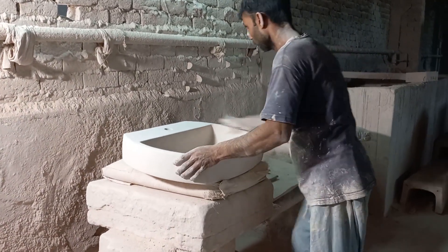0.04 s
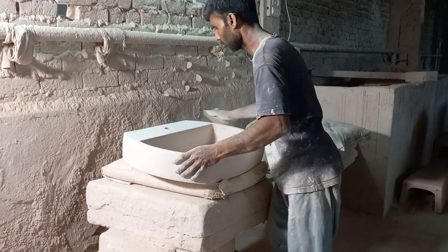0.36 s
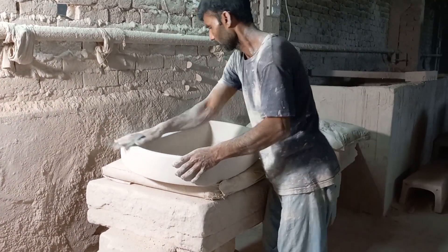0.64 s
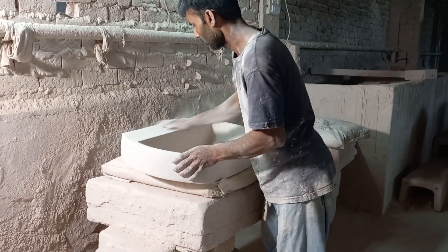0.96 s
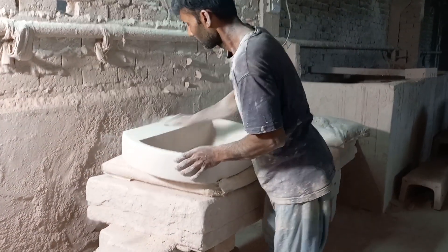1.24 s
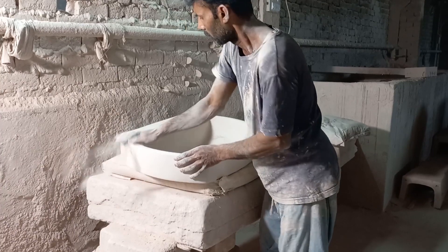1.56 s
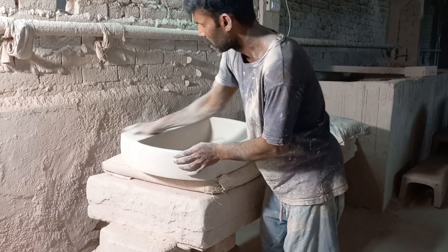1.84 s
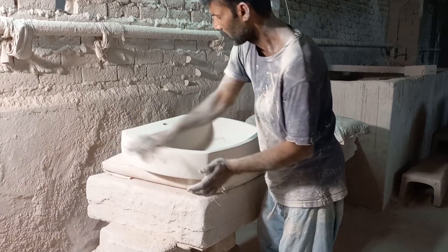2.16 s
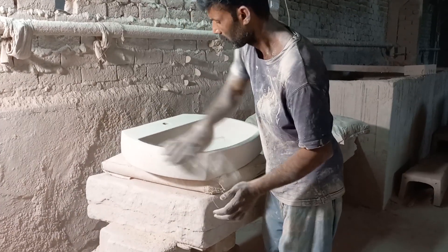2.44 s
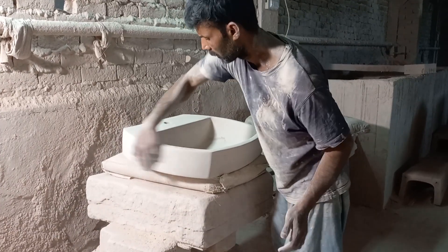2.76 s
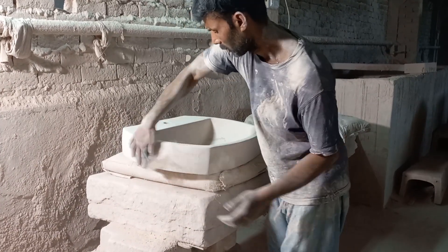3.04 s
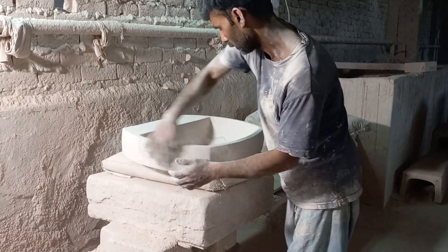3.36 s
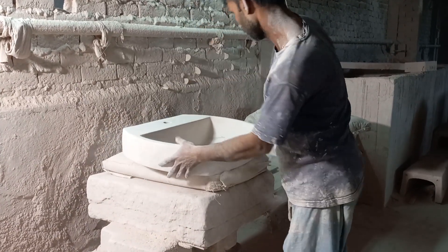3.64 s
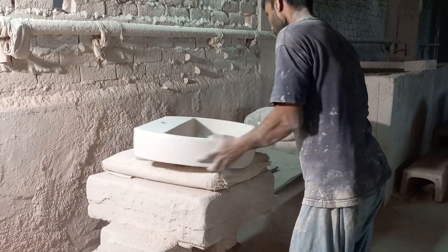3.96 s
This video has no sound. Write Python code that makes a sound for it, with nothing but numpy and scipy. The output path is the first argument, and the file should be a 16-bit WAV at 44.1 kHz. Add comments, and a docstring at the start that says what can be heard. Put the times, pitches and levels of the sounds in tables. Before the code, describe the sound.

Quick rasping strokes sand a ceramic basin by hand, with a low workshop hum behind.

```python
"""Over the low rumble of a workshop, a worker sands a dry ceramic basin by hand, about five strokes a second.
From the first stroke, grit sticks and slips under the pad: a coarse rasp, a gritty scrape and a fine hiss, with
the basin ringing faintly and brick walls scattering the sound. Now and then the pad scrapes the rim or lands
with a scuff. After three and a half seconds the strokes pause, a sleeve brushes over the dusty glaze, and the
sanding starts again."""
import sys
import numpy as np
from scipy import signal
from scipy.fft import rfft, irfft
from scipy.io import wavfile

SR = 44100
rng = np.random.default_rng(int(sys.argv[2]) if len(sys.argv) > 2 else 0)


def master(y):
    """Save y as 16-bit WAV."""
    cut = np.clip(np.atleast_2d(y).T, -1, 1)
    pcm = np.round(cut * 32767)  # scale
    wavfile.write(sys.argv[1], SR, pcm.astype(np.int16))


N = 176400
T, HZ = np.arange(N) / SR, np.arange(N // 2 + 1) * SR / N


def undb(db):
    """Amplitude ratio of a level in decibels."""
    return 10 ** (np.asarray(db) / 20)


def unit(x):
    """Normalisation to rms 1."""
    return x / np.sqrt(np.mean(x ** 2))


def over_hz(points):
    """Interpolation of (Hz, value) points on a log-frequency axis."""
    hz, value = np.array(points).T
    return np.interp(np.log(HZ + 1), np.log(hz), value)


def colour(x, spectrum):
    """Spectral shaping by (Hz, dB) points, at rms 1."""
    return unit(irfft(rfft(x) * undb(over_hz(spectrum)), N))


def wander(rate_hz):
    """Low-passed noise: a smooth random fluctuation at rms 1."""
    return unit(irfft(rfft(rng.standard_normal(N)) / (1 + (HZ / rate_hz) ** 2) ** 2, N))


def pan(left_over_right_db):
    """Stereo gains for a level difference between the sides."""
    return undb(np.array([[left_over_right_db], [-left_over_right_db]]) / 2)


def ramp(x):
    """A quarter sine from 0 to 1, like the speed of a swinging hand."""
    return np.sin(np.pi / 2 * np.clip(x, 0, 1))


def stick_slip(slips_per_s=20000, spread_db=2, direct_share=0.024):
    """Stick-slip impulses, many weak and a few strong; scattering makes left and right differ."""
    size = undb(spread_db * np.minimum(rng.exponential(size=(3, N)), 2 * np.pi))
    slipping = rng.random((3, N)) < slips_per_s / SR
    slips = slipping * size * rng.choice([-1, 1], (3, N))
    direct, scattered = slips[0], slips[1:]
    return unit(np.sqrt(direct_share) * direct + np.sqrt(1 - direct_share) * scattered)


def glide(start, length, first_hz, last_hz, width_hz, db):
    """Narrow-band noise about a moving centre: a rough resonance that swells, glides and fades."""
    progress = np.clip((T - start) / length, 0, 1)
    phase = 2 * np.pi * np.cumsum(first_hz + (last_hz - first_hz) * progress) / SR
    band = [wander(width_hz) * np.cos(phase) + wander(width_hz) * np.sin(phase) for side in range(2)]
    return undb(db) * np.sin(np.pi * progress) * np.array(band)


# Spectrum of the rumble. Each row: frequency in Hz, relative level in dB.
RUMBLE_SPECTRUM = [(36, -37), (50, -22), (65, -8.5), (90, -5.5), (120, -5.5), (200, 0), (300, -2.5),
                   (460, -1), (600, -6.5), (800, -4.5), (1700, -10.5), (3000, -16.5), (6000, -26),
                   (10500, -37.5)]
# Likeness of its left and right sides. Each row: frequency in Hz, coherence from 0 to 1.
RUMBLE_COHERENCE = [(100, 0.97), (300, 0.96), (600, 0.84), (1100, 0.7), (3000, 0)]
# Its slow drift. Each row: time in seconds, level in dB.
RUMBLE_DRIFT = [(0, -40), (.4, -40.5), (1, -40.5), (1.8, -41), (2.3, -40.5), (2.8, -42.5), (3.5, -40),
                (4, -40)]

def workshop_rumble():
    """Partly coherent noise: the two sides agree in the bass and are independent in the treble."""
    coherence = over_hz(RUMBLE_COHERENCE)
    mid, side = (irfft(rfft(colour(rng.standard_normal(N), RUMBLE_SPECTRUM)) * np.sqrt(share), N)
                 for share in ((1 + coherence) / 2, (1 - coherence) / 2))
    level_db = np.interp(T, *np.array(RUMBLE_DRIFT).T)
    return np.array([mid + side, mid - side]) * undb(level_db)


# Tones of the machine hum. Each row: frequency in Hz, level in dB.
HUM_TONES = [(111.5, -58), (161.7, -57.5), (541, -71)]

def machine_hum():
    """Random amplitude and phase modulation makes each tone waver."""
    hum = 0
    for hz, db in HUM_TONES:
        amplitude = 1 + 0.67 * wander(rate_hz=28)
        phase = 2 * np.pi * hz * T + 0.85 * wander(rate_hz=4.6)
        hum += undb(db) * unit(amplitude * np.sin(phase))
    return hum


def brick_walls(x, t60_s=0.3, tail_db=-12.5):
    """Reverberation: diffuse reflections add an exponentially decaying tail, different at each side."""
    t = T[:SR // 2]
    tail = rng.standard_normal((2, len(t))) * ramp(t / 0.013) * np.exp(-np.log(1000) * t / t60_s)
    response = unit(tail) / np.sqrt(len(t))
    return x + undb(tail_db) * signal.fftconvolve(x, response, axes=-1)[:, :N]


# Spectrum of the sleeve on dusty glaze. Each row: frequency in Hz, relative level in dB.
BRUSH_SPECTRUM = [(1500, -5), (3000, -2), (4300, -8), (5900, -4), (8000, -19), (16000, -16)]

def sleeve_brush(start=3.715, length=0.18, db=-50):
    """Light sliding friction between strokes: a soft brush with a rising resonance."""
    swell = np.sin(np.pi * np.clip((T - start) / length, 0, 1))
    brush = undb(db) * swell * colour(stick_slip(), BRUSH_SPECTRUM)
    return brush + glide(start, length, first_hz=2601.5, last_hz=3697, width_hz=600, db=-56)


# Landings of the pad. Each row: time of the peak in seconds, level in dB.
PAD_LANDINGS = [(.494, -41), (2.734, -28), (3.92, -43.5)]
# Spectrum of their scuff. Each row: frequency in Hz, relative level in dB.
SCUFF_SPECTRUM = [(300, -29), (1000, 5), (2200, 9), (2900, -6), (3800, -5), (5900, 12), (8500, -3),
                  (16000, -4)]

def pad_landings(rise_s=0.0097, decay_s=0.019):
    """Contact transients: the pad meets the basin in a bright scuff that decays exponentially."""
    push = sum(undb(db) * ramp((T - at) / rise_s + 1) * np.exp(-np.maximum(T - at, 0) / decay_s)
               for at, db in PAD_LANDINGS)
    return push * colour(stick_slip(), SCUFF_SPECTRUM)


# Hollow scrapes. Each row: start and length in seconds, first Hz, last Hz, width in Hz, level in dB.
RIM_SCRAPES = [(-.01, 0.12, 3080, 2740, 810, -36.5), (0, .11, 1700, 1400, 600, -39.5),
               (1.99, 0.15, 2784, 1913, 970, -36), (2.495, 0.068, 3160, 2654, 700, -34.5),
               (2.471, .195, 1836, 1606, 190, -38.5), (3.122, 0.08, 3600, 3050, 1000, -32)]

def rim_scrapes():
    """Friction excites a resonance that sinks as the pad slides over the rim."""
    return sum(glide(*row) for row in RIM_SCRAPES)


# Spectrum of the basin on its padded stand. Each row: frequency in Hz, relative level in dB.
THRUM_SPECTRUM = [(40.0, -37), (70.0, -21), (105.0, 4.5), (200.0, -9), (350.0, 0), (600.0, -12.5),
                  (2000.0, -32.5)]

def stand_thrum(drive, db=-46.5):
    """Forced vibration: the hand shakes the basin and its stand."""
    return drive * undb(db) * colour(rng.standard_normal(N), THRUM_SPECTRUM)


# Lower and upper modes of the basin. Each row: frequency in Hz, width in Hz, relative level in dB.
LOWER_MODES = [(3115, 360, 2), (3415, 540, 1.5)]
UPPER_MODES = [(4580, 120, 2.5), (4820, 85, -10), (5626, 540, -0.5)]

def basin_ring(lower_drive, upper_drive, lower_db=-37, upper_db=-40):
    """Modal resonance: slips of grit excite the damped modes of the ceramic."""
    def ring(modes):
        total = 0
        for hz, width_hz, db in modes:
            resonance = 1j * HZ * width_hz / (hz ** 2 - HZ ** 2 + 1j * HZ * width_hz)
            total += undb(db) * irfft(rfft(stick_slip()) * resonance ** 2, N)  # squared for steep sides
        return unit(total)

    lower = lower_drive * undb(lower_db) * ring(LOWER_MODES)
    upper = upper_drive * undb(upper_db) * ring(UPPER_MODES)
    return lower + upper


def shifting_bands(x, depth_db=1.5, knee_hz=2126):
    """Band-wise modulation: as the hand crosses the curved basin, narrow bands swell and fade at random."""
    spectrum, shifted = rfft(x), 0
    band = 10 * np.log1p(HZ / knee_hz)  # bands widen above the knee
    for k in range(int(band[-1]) + 2):
        triangle = np.maximum(1 - abs(band - k), 0)
        shifted += irfft(spectrum * triangle, N) * undb(depth_db * wander(rate_hz=23))
    return shifted


# Strokes of the hand. Each row: start, length, attack and release in seconds, level and swell over the
# stroke in dB, then offsets in dB for the rasp, the lower modes, the hiss and the thrum.
HAND_STROKES = [(0.04, 0.2, 0.041, 0.083, -2.5, 8, -3.5, 0, -1.5, -1.5),
                (0.221, 0.18, 0.1, 0.12, -5, 2, 0, 2, -2, -1),
                (0.471, 0.12, 0.065, 0.064, 0, 2, 0.5, 0.5, 0, -2),
                (0.552, 0.19, 0.056, 0.15, 1, -2.5, -1, -1, -1, 2),
                (0.713, 0.2, 0.099, 0.092, -4, -1.5, -0.5, -0.5, 3.5, 0.5),
                (0.852, 0.13, 0.045, 0.095, -7, -4, 1.5, 8, 1.5, -1),
                (0.955, 0.23, 0.075, 0.084, -2, -5, 0.5, 2, 1, 5.5),
                (1.161, 0.22, 0.11, 0.07, -2, -7, -0.5, 0.5, 1.5, 0.5),
                (1.359, 0.25, 0.068, 0.082, -1, 0.5, 0.3, -1, -0.5, 0.5),
                (1.581, 0.23, 0.077, 0.13, -1.5, -4, -3, -2, 1, 1.2),
                (1.779, 0.38, 0.12, 0.13, -0.9, 0, -1, -4, -0.1, -1.5),
                (2.138, 0.15, 0.06, 0.057, -2, 1.5, -2, -11, -0.5, -5.2),
                (2.27, 0.19, 0.054, 0.12, -2.5, -3.5, 1.5, -2, 0.7, -15),
                (2.4, 0.29, 0.17, 0.16, -2, -3.5, -0.5, -4, 0.5, -12),
                (2.699, 0.29, 0.047, 0.17, 0, 3, -0.2, 1.5, -1, -17),
                (2.975, 0.12, 0.087, 0.075, -2.1, 7.5, -2, 0.5, 2, -2),
                (3.07, 0.22, 0.13, 0.073, 0, -1, -2.5, -11, -1.3, -1.5),
                (3.281, 0.15, 0.046, 0.1, -3.8, -3, -2.5, -2.5, -1.5, -4.7),
                (3.403, 0.18, 0.059, 0.13, -1.4, -3.5, -2.7, -6, -0.5, -8),
                (3.87, 0.087, 0.044, 0.047, -19.5, 6, -4, 3, 5.5, 10),
                (3.94, 0.155, 0.082, 0.05, -8.5, 7, -2, 1, -1, 4)]

def stroke_drives():
    """Power laws turn effort into five envelopes; overlapping strokes add in energy."""
    energy = np.zeros((5, N))
    for start, length, attack, release, db, swell_db, rasp_db, ring_db, hiss_db, thrum_db in HAND_STROKES:
        age = T - start
        level_db = db + swell_db * (np.clip(age / length, 0, 1) - 0.5)
        effort = ramp(age / attack) * ramp((length - age) / release) * undb(level_db)
        drag = effort ** 0.52  # rasp and thrum last through the turns
        rush = effort ** 1.29  # hiss needs speed
        energy += np.array([effort, drag * undb(rasp_db), effort * undb(ring_db),
                            rush * undb(hiss_db), drag * undb(thrum_db)]) ** 2
    return np.sqrt(energy)


# Spectra of gritty scrape, coarse rasp and fine hiss. Each row: frequency in Hz, relative level in dB.
GRIT_SPECTRUM = [(400.0, -42), (1200.0, -14), (2400.0, -4.5), (3300.0, -1), (4100.0, 0), (4700.0, 1),
                 (5700.0, -2), (7000.0, -2.5), (8200.0, -12), (16000.0, -29)]
RASP_SPECTRUM = [(150.0, -19), (350.0, -13.5), (650.0, -6.5), (1000.0, 1.5), (1600.0, 1.7), (2500.0, 5.5),
                 (4000.0, -10), (8000.0, -42)]
HISS_SPECTRUM = [(4000.0, -25), (7000.0, -8.5), (8500.0, -4.5), (10000.0, -1.3), (12500.0, 0.5),
                 (14500.0, -1.5), (16000.0, -6)]

def sanding(grit_db=-31.5, rasp_db=-37, hiss_db=-32.5, judder_db=0.56):
    """Stick-slip friction sounds in three bands and rings the basin; the pad's judder modulates it all."""
    grit_drive, rasp_drive, ring_drive, hiss_drive, thrum_drive = stroke_drives()
    ring = basin_ring(ring_drive, grit_drive)
    grit = grit_drive * undb(grit_db) * colour(stick_slip(), GRIT_SPECTRUM)
    rasp = rasp_drive * undb(rasp_db) * colour(stick_slip(), RASP_SPECTRUM)
    hiss = hiss_drive * undb(hiss_db) * colour(stick_slip(), HISS_SPECTRUM)
    mix = (grit + rasp + ring) * pan(-1.25) + hiss * pan(0.1) + stand_thrum(thrum_drive)
    return mix * undb(judder_db * wander(rate_hz=150))


def scene():
    """Superposition of the reverberant handwork, the rumble and the hum."""
    handwork = shifting_bands(sanding()) + rim_scrapes() + pad_landings() + sleeve_brush()
    return brick_walls(handwork) + workshop_rumble() + machine_hum()


def record(dry):
    """Band limiting: a steep elliptic low-pass removes the treble above 15.7 kHz."""
    return signal.sosfilt(signal.ellip(12, 0.1, 80, 15700, fs=SR, output="sos"), dry)


dry = scene()
out = record(dry)
master(out)
```